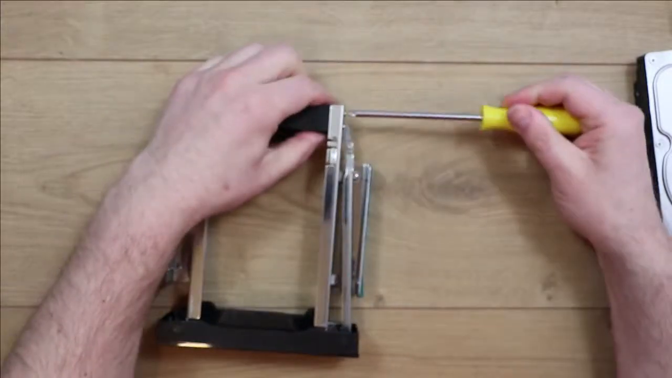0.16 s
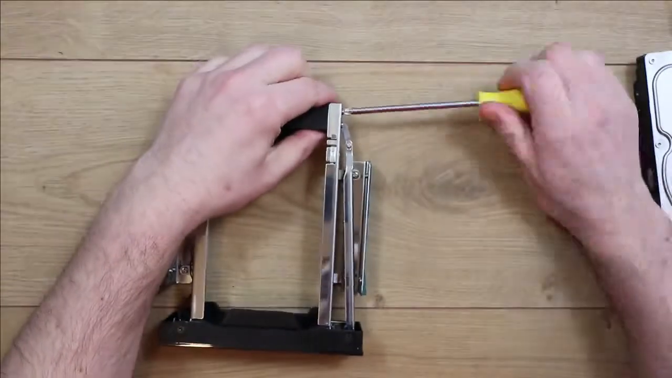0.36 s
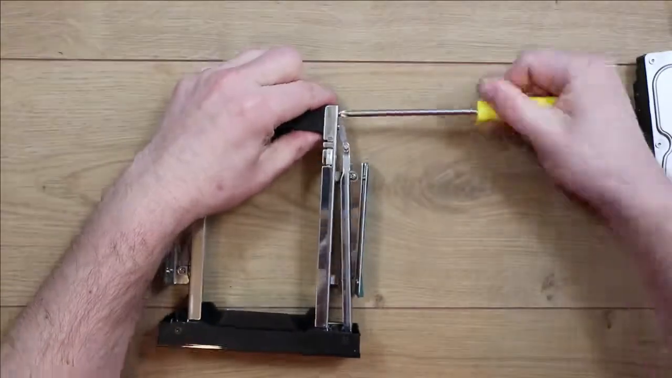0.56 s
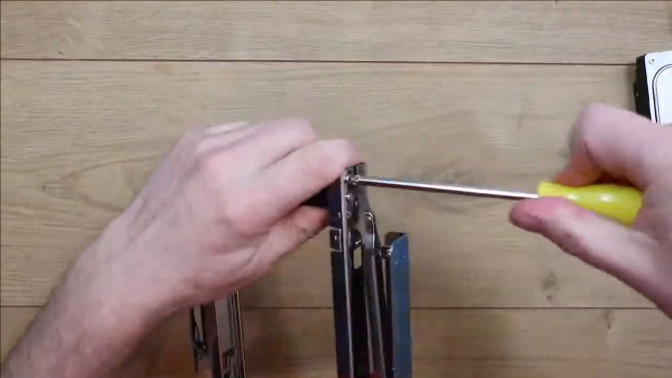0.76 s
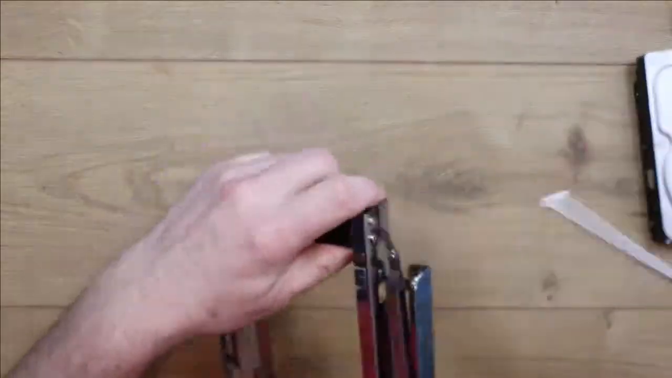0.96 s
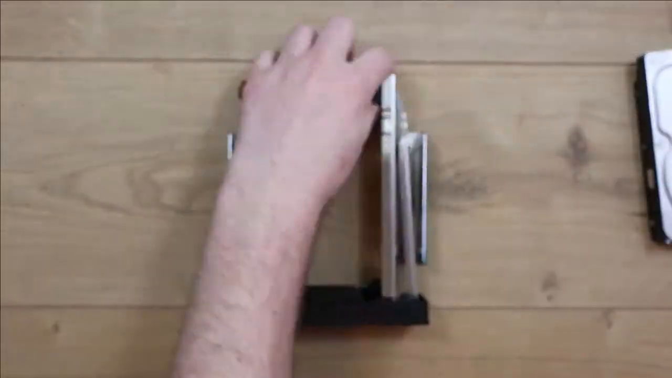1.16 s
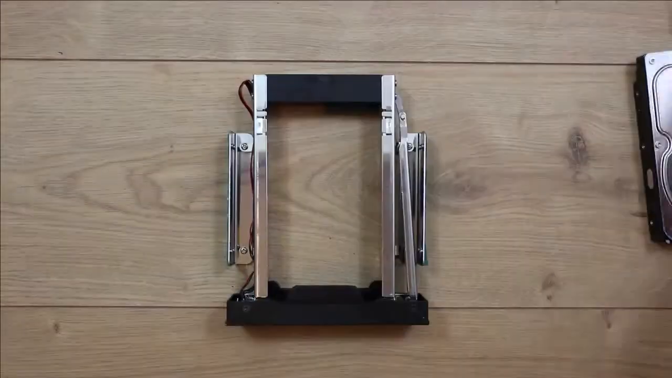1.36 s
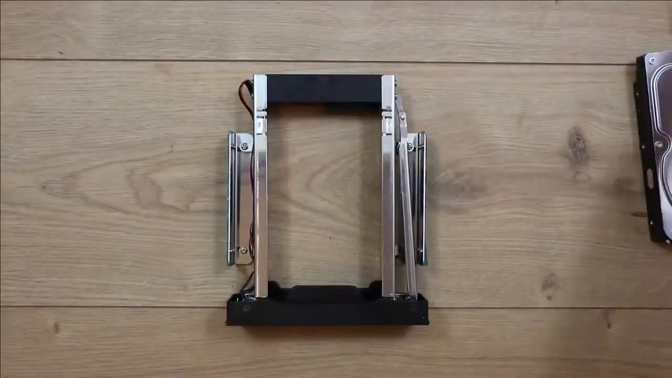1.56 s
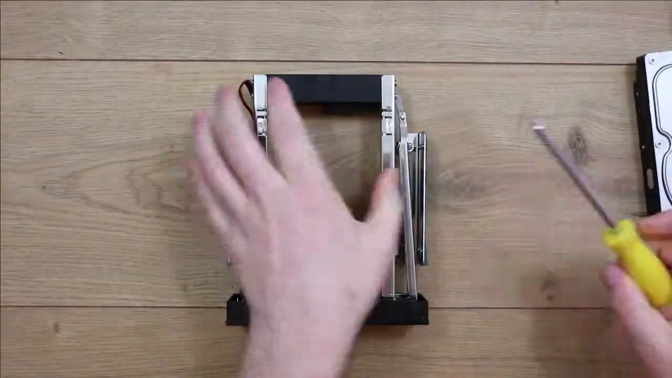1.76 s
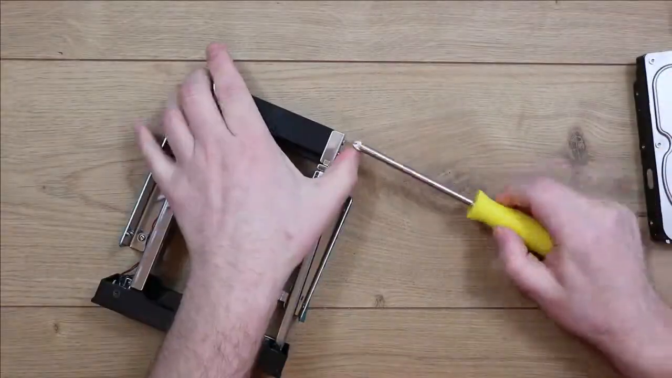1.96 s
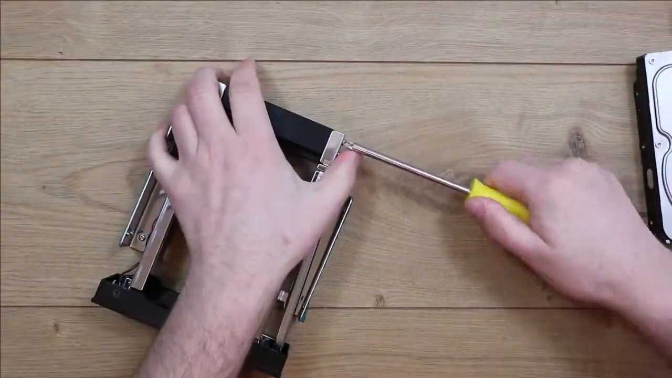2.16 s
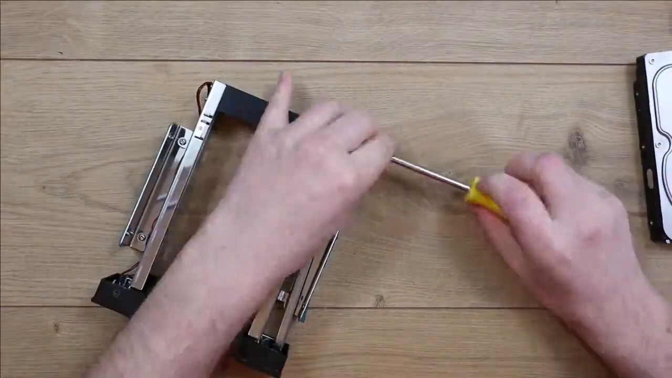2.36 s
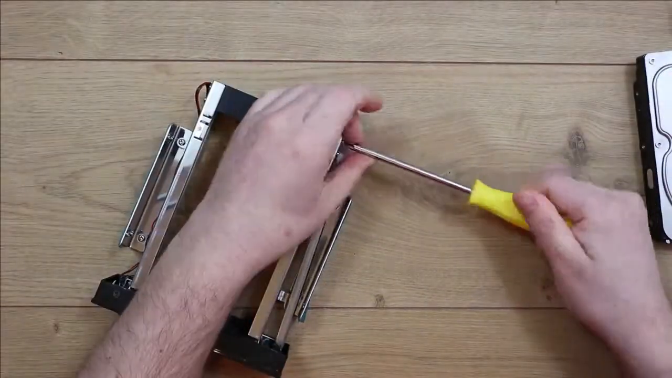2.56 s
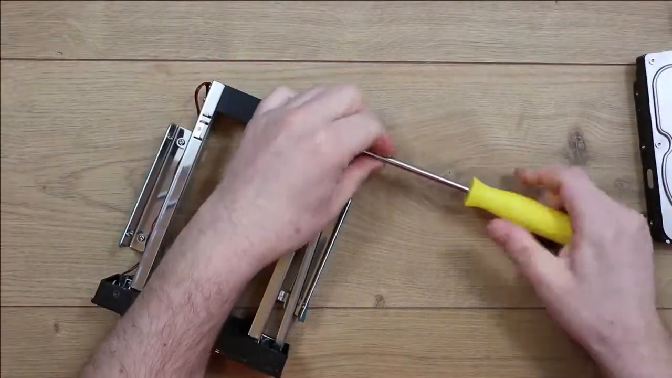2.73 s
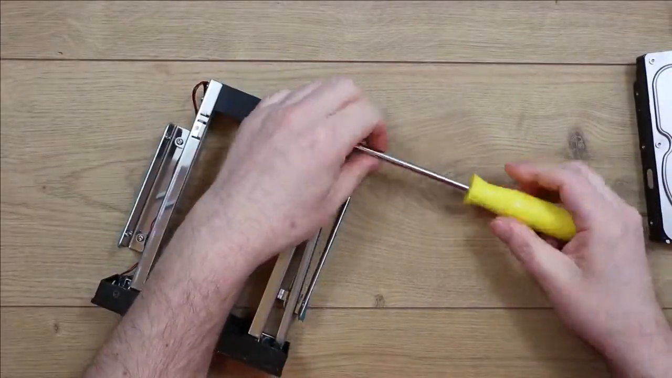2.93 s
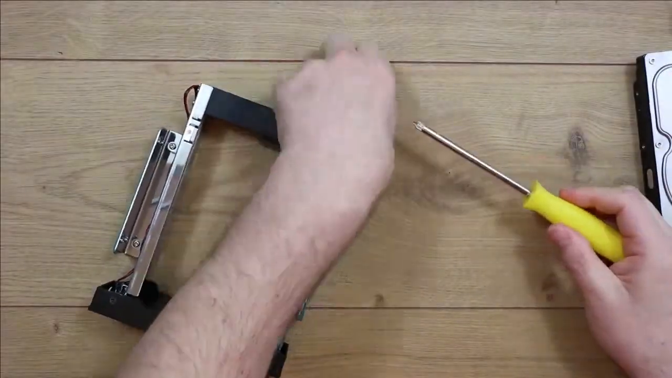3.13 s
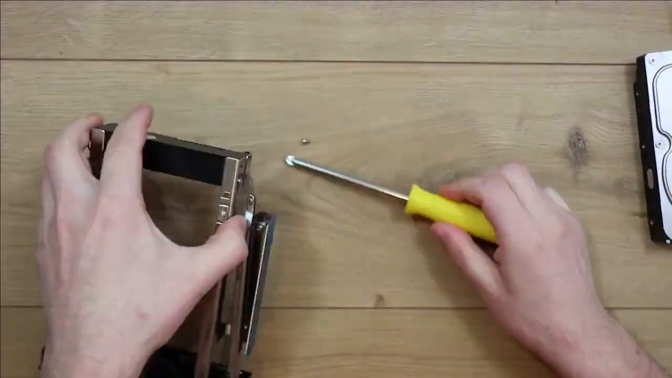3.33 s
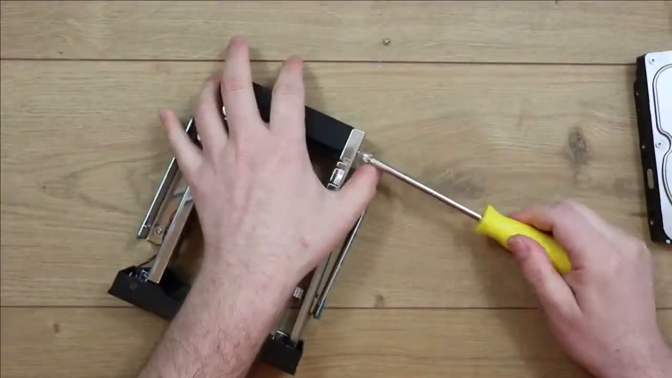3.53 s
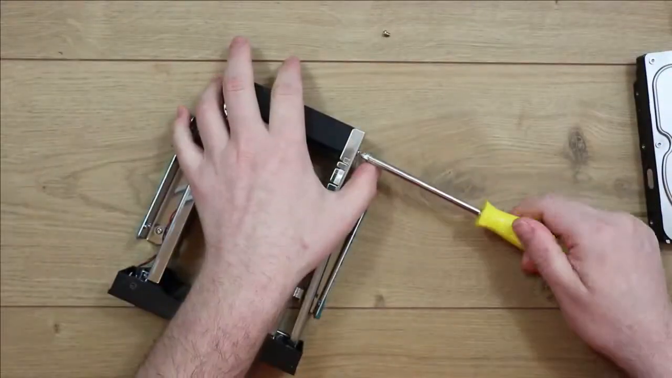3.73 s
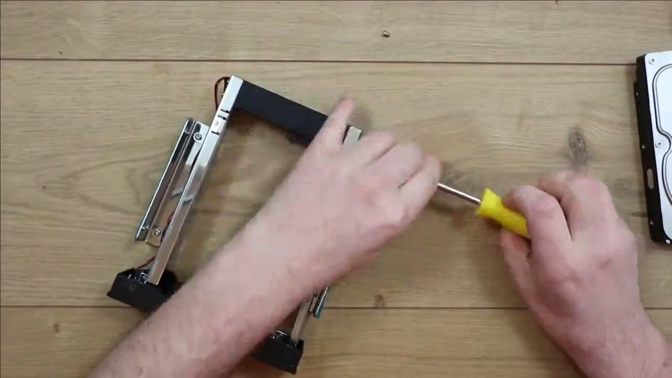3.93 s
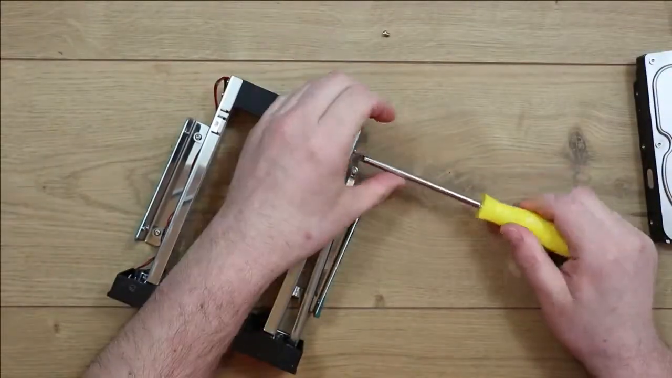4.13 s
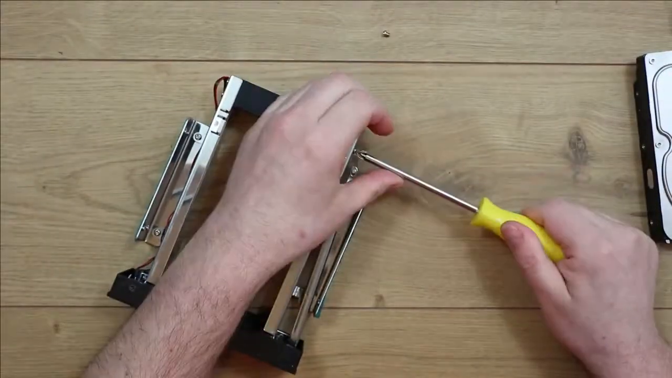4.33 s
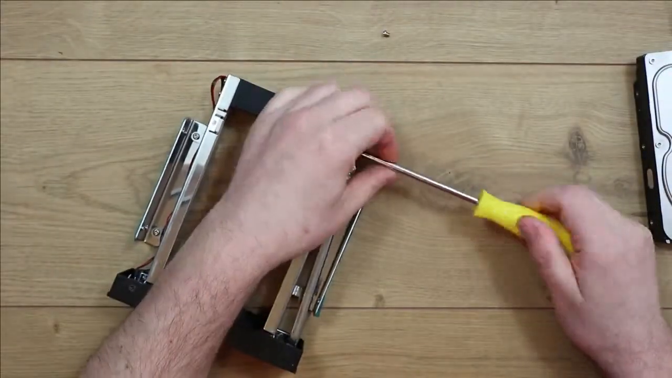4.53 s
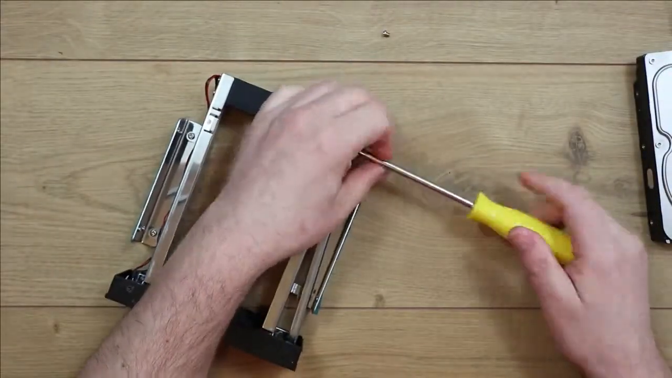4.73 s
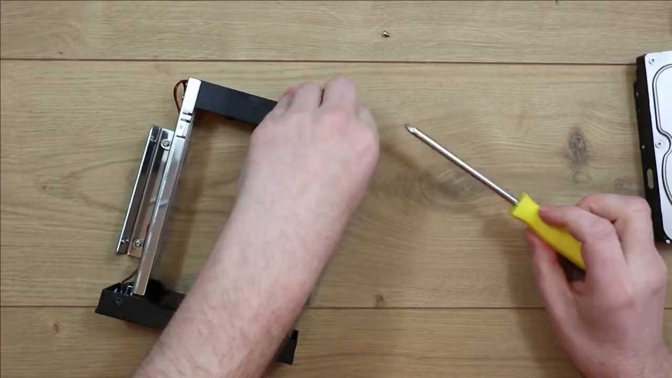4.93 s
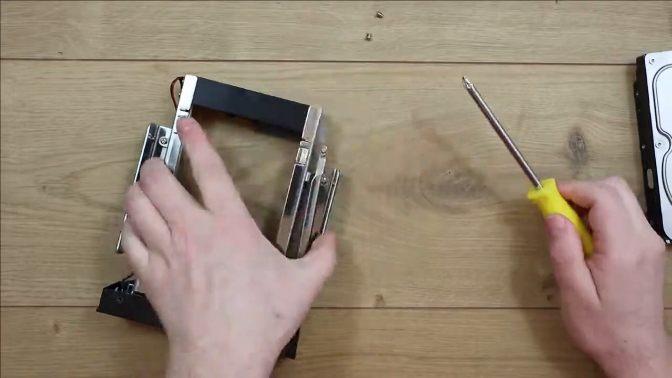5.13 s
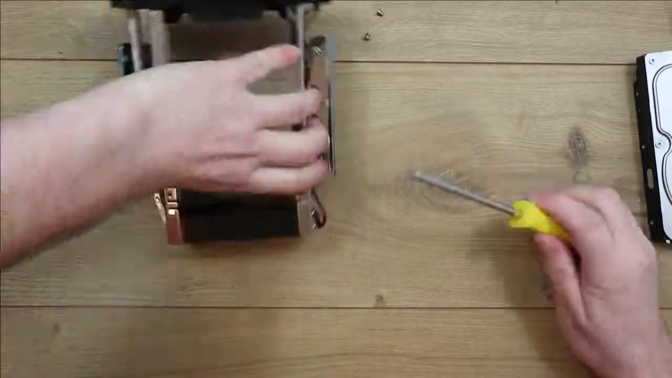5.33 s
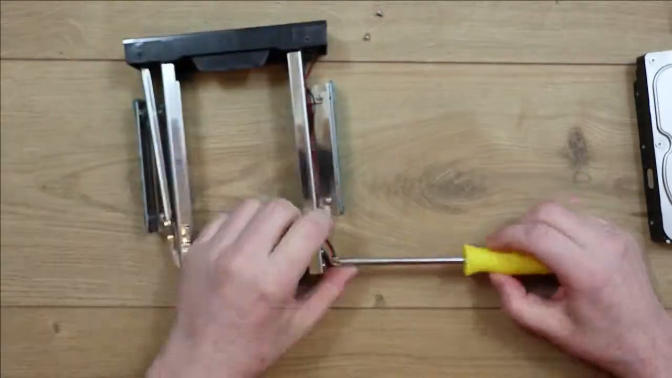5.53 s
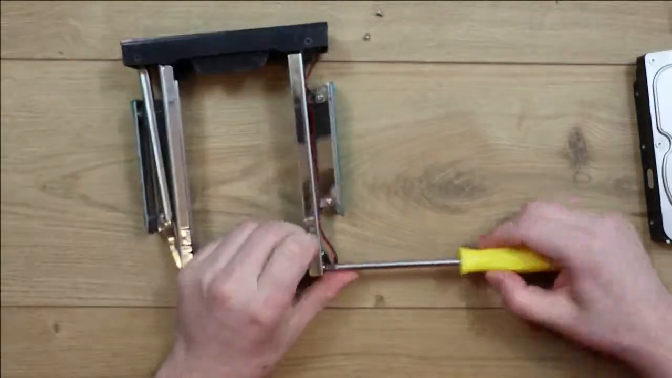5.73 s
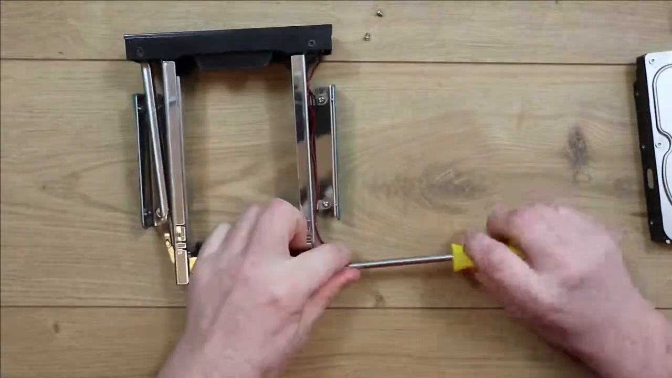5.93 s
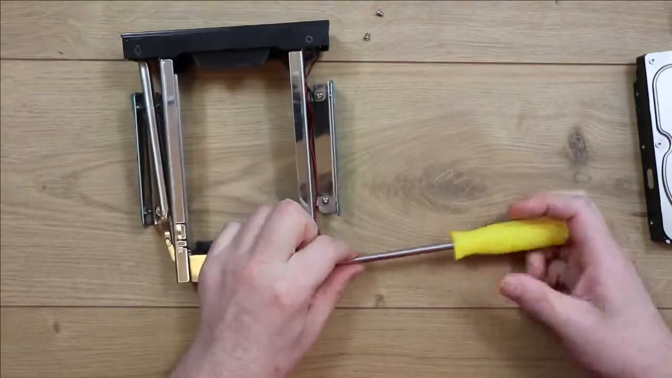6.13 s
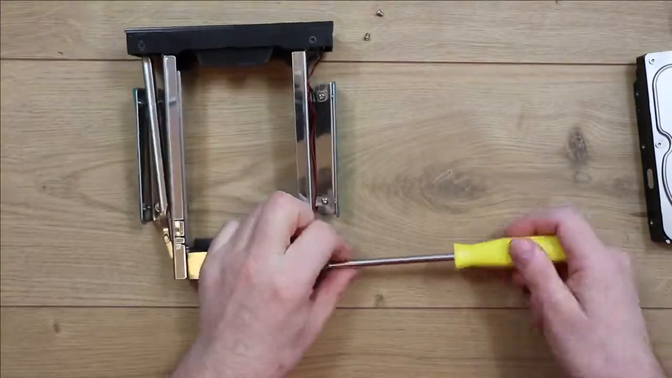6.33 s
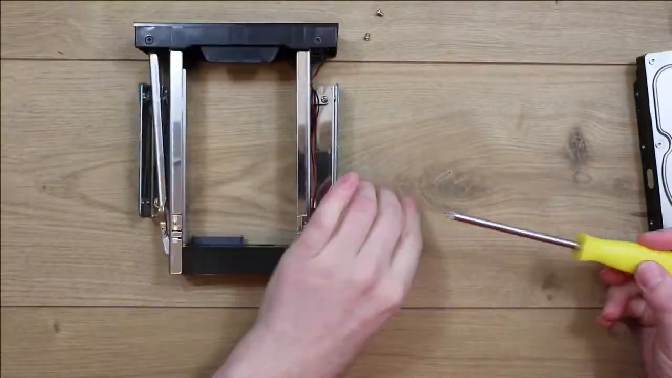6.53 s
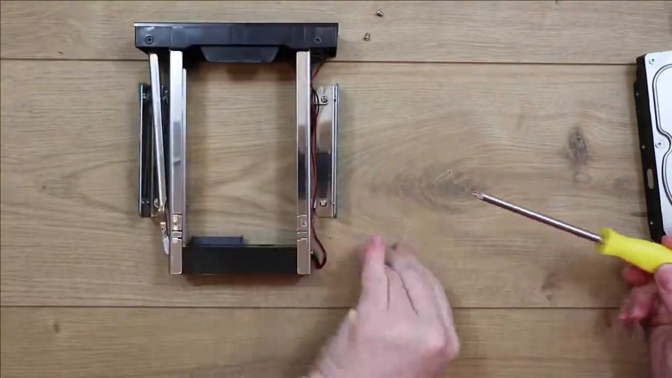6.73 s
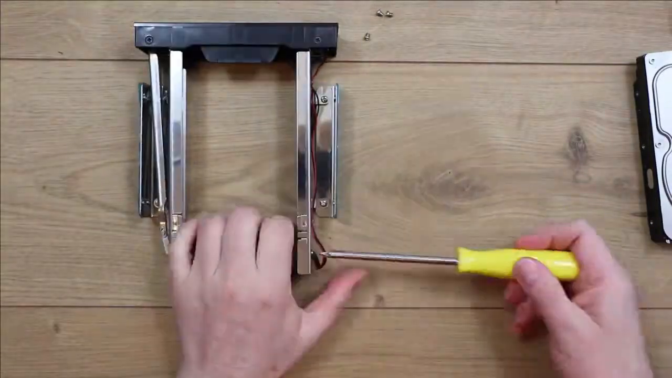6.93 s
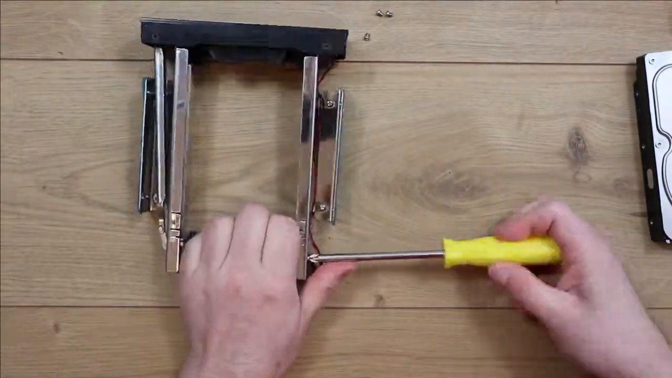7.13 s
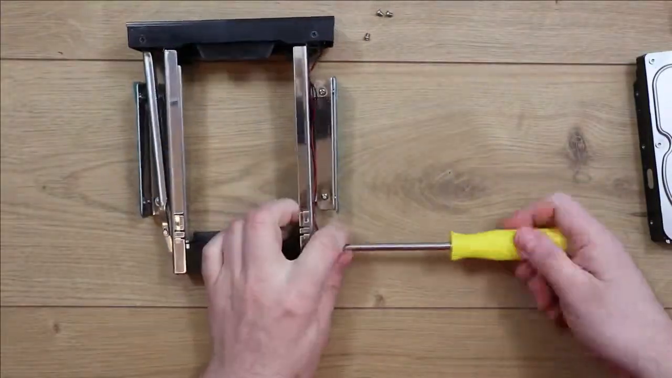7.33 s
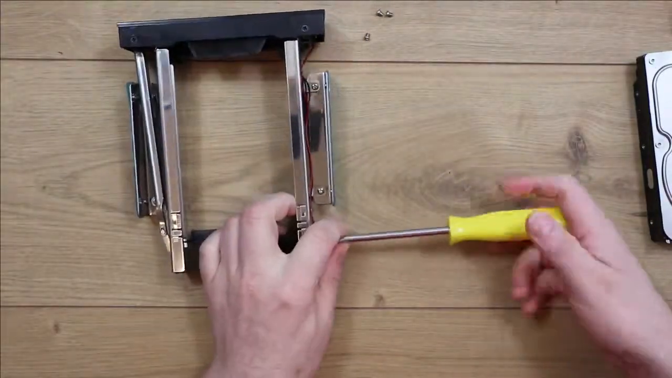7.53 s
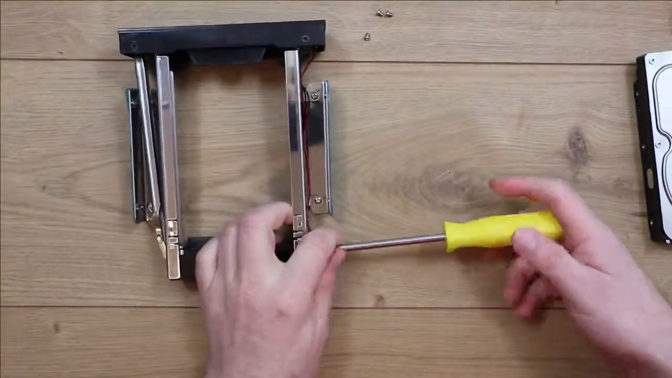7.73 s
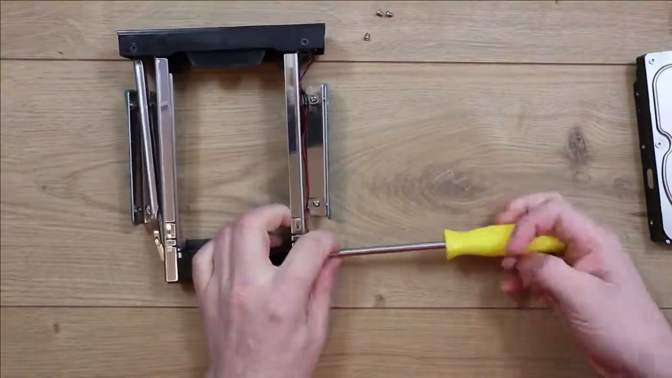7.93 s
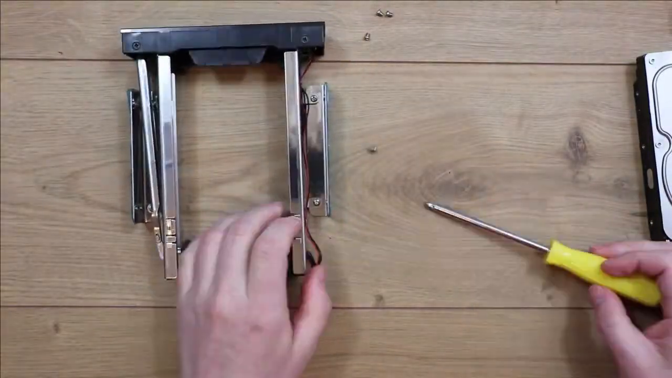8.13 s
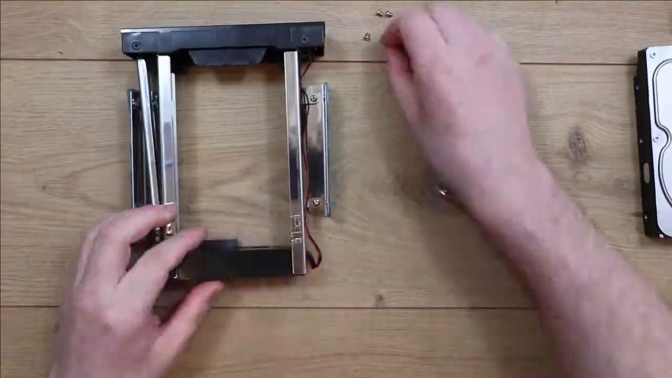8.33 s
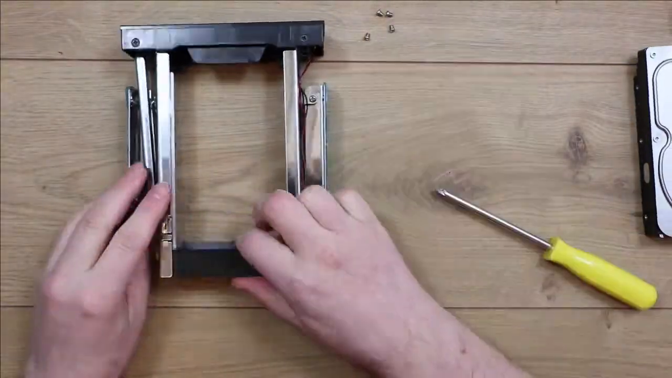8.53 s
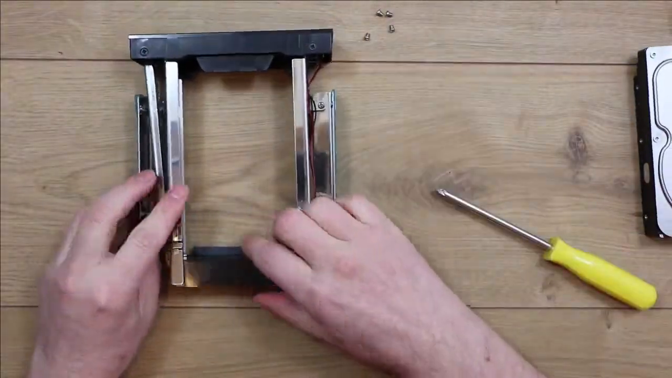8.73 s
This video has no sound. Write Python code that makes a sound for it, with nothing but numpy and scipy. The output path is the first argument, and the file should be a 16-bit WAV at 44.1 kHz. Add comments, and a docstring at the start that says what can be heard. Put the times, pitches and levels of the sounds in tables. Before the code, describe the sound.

Irregular handling of small metal parts on a wooden board, heard very close and dry: crisp steel ticks, short hollow frame clacks, dull low knocks and tiny scrapes. Bursts of contact alternate with faint fingering and screwdriver clicks. A thin electric hum and hiss sit steadily behind, dipping slightly after the loudest hits. The opening instant has a deeper, wider hum that stops abruptly; the ending is almost only hum.

```python
"""A screwdriver turns small screws out of a metal drive frame on a wooden table, close under a camera.
Steel ticks are decaying noise, the frame clacks in damped modes, knocks ring the board, and slides are lumpy noise.
A machine hums thinly in the room: sines with drifting phase, narrow noise bands and hiss.
For the first instant a deeper, wider hum of noise bands is heard instead, then it cuts off.
The camera's gain control dips after loud moments."""
import sys
import numpy as np
from scipy import signal
from scipy.fft import rfft, irfft, next_fast_len
from scipy.io import wavfile
from scipy.ndimage import uniform_filter1d, map_coordinates

SR = 44100
rng = np.random.default_rng(int(sys.argv[2]) if len(sys.argv) > 2 else 0)


def file_out(sig):
    """Save sig as 16-bit WAV at sys.argv[1]."""
    # one column per channel
    cols = np.atleast_2d(sig).T
    # limit, then scale
    lim = np.clip(cols, -1, 1)
    pcm = np.round(lim * 32767).astype(np.int16)
    wavfile.write(sys.argv[1], SR, pcm)


N = 387198
SECONDS = np.arange(N) / SR
CUT_S = 0.128  # the opening hum stops and the room begins

# resonances of the metal frame: (frequency [Hz], bandwidth [Hz], relative level [dB])
FRAME = [(972, 92, 5), (1118, 56, 1.5), (1279, 58, -1), (1457, 49, 1.5), (1726, 55, 3.5), (1966, 64, 1),
         (2570, 33, -7), (3188, 22, -2)]
# faint thudding in the table top, before its random flutter: (time [s], level [dB])
MURMUR = [(0.14, -69.5), (0.33, -61.5), (0.52, -56), (1.29, -68), (1.75, -57.5), (1.92, -63.5), (4.04, -61),
          (4.37, -71), (4.85, -50.5), (5.53, -67), (6.15, -50.5), (6.4, -53.5), (6.64, -66), (7.45, -53),
          (7.89, -54), (8.06, -47.5), (8.39, -64.5), (8.78, -61)]


def amp(db):
    """Decibels to gain."""
    return 10 ** (np.asarray(db) / 20)


def unit(x):
    """Scaled to rms 1."""
    return x / np.sqrt(np.mean(x ** 2) + 1e-20)


def decay(t, t60):
    """Exponential fall of 60 dB in t60 seconds."""
    return amp(-60 * t / t60)


def onset(t, rise_s):
    """Exponential rise towards 1 with time constant rise_s."""
    return 1 - np.exp(-t / rise_s)


def sine(hz, t, phase=0):
    """Pure tone with an optional phase in radians."""
    return np.sin(2 * np.pi * hz * t + phase)


def along(points, hz):
    """Values of (frequency, value) points, interpolated on a log frequency axis."""
    f, v = np.transpose(points)
    return np.interp(np.log(hz + 1), np.log(f + 1), v)


def curves(rows):
    """One curve over the whole scene for each column after the time."""
    s, *cols = np.transpose(rows)
    return [np.interp(SECONDS, s, c) for c in cols]


def wobble(rate):
    """A smooth random curve, rate knots a second."""
    knots = rng.standard_normal(int(N * rate / SR) + 4)
    return map_coordinates(knots, [SECONDS * rate])


def filtered(x, response):
    """x shaped by a complex response of frequency."""
    m = next_fast_len(N + 8192)
    shaped = rfft(x, m) * response(np.fft.rfftfreq(m, 1 / SR))
    return irfft(shaped, m)[..., :N]


def highpass(hz):
    """First-order bass roll-off below hz."""
    return lambda f: 1j * f / (hz + 1j * f)


def modes(table):
    """Causal response of a bank of resonances with alternating signs."""
    def response(f):
        total = 0
        for k, (centre, width, db) in enumerate(table):
            resonance = 1j * f * width / (centre ** 2 - f ** 2 + 1j * f * width)
            total = total + (-1) ** k * amp(db) * resonance
        return total
    return response


def noise(spectrum):
    """Coloured noise of rms 1."""
    return unit(filtered(rng.standard_normal(N), lambda hz: amp(along(spectrum, hz))))


def fuzzy_tone(hz, width_hz):
    """Narrow noise of rms 1 around one pitch, with a bell-shaped band."""
    return unit(filtered(rng.standard_normal(N), lambda f: np.exp(-((f - hz) / width_hz) ** 2)))


def add(track, s, sound):
    """Mixes a sound in at time s."""
    part = track[round(s * SR):][:len(sound)]
    part += sound[:len(part)]


def lagged(x, seconds):
    """x followed sluggishly, by a one-pole smoother."""
    keep = np.exp(-1 / (seconds * SR))
    return signal.lfilter([1 - keep], [1, -keep], x)


def steel_noise(patch_db):
    """Dull and bright steel-coloured noise whose colour flickers at random from moment to moment."""
    # colour of ticks and rasp: (frequency [Hz], relative density [dB per Hz])
    steel_colour = [(700, -16), (1500, 2), (2500, 3.5), (3500, 2.5), (5000, -0.5), (7400, -3.5),
                    (10000, -9), (16000, -13)]
    z = signal.stft(noise(steel_colour), nperseg=256)[2]
    across_pitch = uniform_filter1d(rng.standard_normal(z.shape), 3, 0)
    patches = unit(uniform_filter1d(across_pitch, 5, 1))
    both = signal.istft(z * amp(patch_db * patches), nperseg=256)[1][:N]
    bright = filtered(both, lambda hz: 1 / (1 + (7000 / (hz + 1)) ** 8))
    return unit(both - bright), unit(bright)


def opening():
    """A deep buzzing hum of narrow noise bands in a wide rumble, cut off short."""
    # hum bands: (frequency [Hz], band half-width [Hz], rms level [dB])
    deep_bands = [(49.7, 9, -58), (98, 6.8, -40.5), (191, 29, -53.5), (294, 46, -55.5)]
    # rumble colour: (frequency [Hz], relative density [dB per Hz])
    deep_colour = [(88, -12), (150, -13), (259, -16), (475, -7), (545, -20), (601, -11), (1290, -21.5),
                   (2600, -27.5), (16000, -52)]
    hum = sum(amp(db) * fuzzy_tone(hz, width) for hz, width, db in deep_bands)
    air = amp(-51.5) * noise(deep_colour)
    wide_colour = deep_colour[:1] + [(400, -3), (3000, -10), (16000, -56)]
    wide = amp(-58.0) * noise(wide_colour)
    # opposite signs left and right spread the rumble
    return (hum + air + np.array([wide, -wide])) * (SECONDS <= CUT_S)


def room():
    """A hum with thin tones above it, hiss, and hands thudding faintly in the table top."""
    # fuzzy bands above the hum: (frequency [Hz], band half-width [Hz], level against the hum [dB])
    whine_bands = [(942, 30, -16.5), (1634, 130, -19), (2400, 130, -24), (3160, 54, -25.5)]
    # room hiss: (frequency [Hz], relative density [dB per Hz])
    hiss_colour = [(25, -6), (90, -3.5), (180, 7.5), (400, 4.5), (750, 4), (1200, -0.5), (1800, 1),
                   (2500, 2), (3600, -3.5), (4500, -2), (5600, -8.5), (10000, -15), (16000, -16)]
    murmur_db, = curves(MURMUR)
    hum = 1.3 * sine(500.6, SECONDS, 0.38 * wobble(5)) + 0.54 * fuzzy_tone(502.3, 42)
    thin_tone = amp(-13.5) * sine(1583, SECONDS, 0.42 * wobble(8.7))
    whine = sum(amp(db) * fuzzy_tone(hz, width) for hz, width, db in whine_bands)
    machine = amp(1.33 * wobble(12)) * (hum + thin_tone + whine)
    hiss = amp(-7 + 1.2 * wobble(30)) * noise(hiss_colour)
    murmur = amp(murmur_db + 4.5 * wobble(30)) * fuzzy_tone(287, 41.6)
    return (amp(-52) * (machine + hiss) + murmur + fidgeting()) * (SECONDS > CUT_S)


def fidgeting():
    """Fingers and tool tip make countless faint ticks, thickest while the table murmurs; they also nudge the frame."""
    busy_follows = 0.6  # how far the tick rate follows the murmur [dB per dB]
    when, size, nudge = rng.random((400, 3)).T
    busy = np.cumsum(amp(busy_follows * curves(MURMUR)[0]))
    at = np.searchsorted(busy / busy[-1], when)
    blows, nudges = np.zeros(N), np.zeros(N)
    # the logarithms make strong ticks rare
    blows[at] = amp(-68.5 - 4.4 * np.log(size + 0.02))
    nudges[at] = amp(-24.5 - 1.97 * np.log(nudge + 0.049))
    fall = decay(np.arange(SR // 20) / SR, 0.046)
    grit, rasp = steel_noise(patch_db=8)
    ticks = signal.fftconvolve(blows, fall)[:N] * (0.93 * grit + rasp)
    return ticks + filtered(nudges, modes(FRAME))


def taps():
    """Each steel contact is a sharp spike and a dying crack of noise, dull or bright."""
    # steel ticks: (time [s], level [dB], share above 7 kHz [dB])
    contacts = [(0.2156, -37, 0), (0.265, -41, -4), (0.393, -38, -0.5), (0.4494, -27, -1.5),
                (0.635, -32.5, -7), (1.1031, -22, -0.5), (1.1383, -20, 2), (1.1719, -22.5, -4.5),
                (1.2482, -25.5, -17), (1.2717, -11.5, -5.5), (1.3355, -41, -2.5), (1.363, -20.5, -14.5),
                (1.427, -25, -9.5), (1.4959, -18.5, -1), (1.598, -27.5, -8), (1.6863, -29.5, -11),
                (1.724, -34.5, -9), (2.0928, -41.5, -3.5), (2.3992, -34, -3), (2.422, -36.5, -8.5),
                (2.474, -34.5, -5.5), (2.5855, -42, -4.5), (2.6215, -30.5, -5.5), (2.899, -31.5, -3),
                (2.931, -36.5, -12.5), (2.9494, -39.5, -9), (2.98, -34, -4), (3.0063, -35, 0),
                (3.3113, -27, -15), (3.3301, -26, -0.5), (3.3665, -27, -0.5), (3.4902, -16, -0.5),
                (3.7251, -31, -1), (3.787, -36.5, -7), (3.9038, -32.5, -1), (3.9956, -25.5, -1),
                (4.036, -35, -3), (4.07, -25, -1.5), (4.1825, -38.5, -2), (4.3006, -38.5, -3),
                (4.4257, -41, -2), (4.6613, -44, -12), (4.7016, -36, -4), (4.7354, -32.5, -2.5),
                (4.7713, -30.5, -7), (4.8489, -38.5, -1), (4.8695, -33.5, -12), (4.9104, -25, 0.5),
                (4.9905, -31, -0.5), (5.0646, -38.5, 0), (5.1323, -32.5, -3), (5.1818, -29.5, -1.5),
                (5.2296, -29, -0.5), (5.4233, -16, -3.5), (5.567, -38.5, -0.5), (5.642, -33, 0),
                (5.806, -25.5, -0.5), (5.8658, -39.5, -6.5), (6.0439, -34.5, -4.5), (6.243, -34, -4),
                (6.2635, -22, -3), (6.3113, -38, -14), (6.391, -38, -6), (6.4194, -31.5, -6),
                (6.4396, -20, -2), (6.4651, -15, -3), (6.987, -35, -3), (7.0062, -31, -0.5),
                (7.089, -31.5, -2), (7.131, -23.5, -4.5), (7.1535, -28.5, -0.5), (7.236, -17, -9),
                (7.26, -31.5, -14), (7.305, -34, -3), (7.329, -34.5, -2.5), (7.3574, -38.5, -2.5),
                (7.664, -40.5, -4), (7.9006, -40.5, -1), (7.979, -40, -7), (8.0477, -30.5, -2.5),
                (8.115, -21, -5), (8.1616, -10, 0), (8.214, -18.5, -9.5), (8.2568, -27, -16),
                (8.5588, -26, -0.5), (8.6486, -41.5, -23), (8.713, -35.5, -2.5), (8.763, -42.5, 2)]
    t60_s, t60_spread = 0.044, 0.14  # typical decay, and its log scatter
    t = np.arange(SR // 10) / SR
    dull, bright = np.zeros(N), np.zeros(N)
    for (s, db, bright_db), chance in zip(contacts, rng.standard_normal(len(contacts))):
        share = np.clip(amp(bright_db), 0, 0.97)
        spike = 0.7 * decay(t, 0.0068)
        crack = decay(t, t60_s * np.exp(t60_spread * chance)) * onset(t, 0.00087)
        fall = amp(db - 7) * (crack + spike)
        add(dull, s, np.sqrt(1 - share ** 2) * fall)
        add(bright, s, share * fall)
    low, high = steel_noise(patch_db=4.5)
    return dull * low + bright * high


def knocks():
    """Soft blows ring a close pair of low board modes, whose beat swells, dips and rebounds, and one mode above."""
    # knocks into the table top: (time [s], low pair level [dB], upper mode level [dB])
    board_hits = [(0.217, -60, -51), (0.352, -40, -46.5), (0.385, -32.5, -41.5), (0.53, -26.5, -37.5),
                  (0.745, -27, -55.5), (1.112, -44.5, -40), (1.143, -29.5, -35.5), (1.218, -40, -46),
                  (1.433, -45.5, -41), (1.612, -38.5, -41), (1.831, -33.5, -32), (1.936, -43.5, -45),
                  (2.344, -45, -37), (2.403, -35, -40.5), (2.428, -37.5, -41), (2.624, -47.5, -35),
                  (2.899, -41, -41), (2.932, -47, -35), (2.981, -43, -36.5), (3.304, -36, -41),
                  (3.375, -49, -37), (3.459, -26, -32), (3.492, -23.5, -24.5), (3.851, -35.5, -47),
                  (3.907, -38.5, -31), (3.996, -37, -38), (4.072, -38, -41), (4.427, -63, -42),
                  (4.82, -55.5, -38.5), (4.911, -44, -36), (4.99, -48, -40), (5.133, -30.5, -37),
                  (5.226, -42, -40.5), (5.251, -40.5, -41), (5.425, -37, -28), (5.457, -31, -41),
                  (5.808, -51, -38.5), (5.946, -34, -42), (5.979, -38.5, -42), (6.026, -37.5, -39),
                  (6.2, -39, -41), (6.265, -38, -31.5), (6.359, -36.5, -40), (6.405, -40, -53),
                  (6.466, -32.5, -25.5), (6.595, -36, -41), (6.875, -40, -51), (6.986, -27.5, -41.5),
                  (7.135, -34, -33.5), (7.238, -37, -34.5), (7.387, -47, -46.5), (7.548, -41, -40.5),
                  (7.822, -40, -41.5), (7.976, -45, -43), (8.049, -55, -38), (8.116, -30, -24.5),
                  (8.164, -36, -36), (8.204, -40, -39), (8.308, -43, -41.5)]
    pair_hz, pair_scatter_hz, split_hz, upper_hz = 284.2, 13.5, 42.5, 513.2
    t, out = np.arange(SR // 6) / SR, np.zeros(N)
    for (s, low_db, upper_db), chance in zip(board_hits, rng.standard_normal(len(board_hits))):
        hz = pair_hz + pair_scatter_hz * chance
        pair = sine(hz + split_hz / 2, t) - 0.98 * sine(hz - split_hz / 2, t)
        low = amp(low_db) * decay(t, 0.12) * pair * onset(t, 0.00014)
        upper = amp(upper_db + 6.5) * decay(t, 0.072) * sine(upper_hz, t) * onset(t, 0.0023)
        add(out, s, low + upper)
    return out


def clacks():
    """Each clack rings the frame's modes at new strengths, most of all near the spot's own pitch."""
    # clacks of the frame: (time [s], level [dB], frequency of the mode struck hardest [Hz])
    frame_hits = [(0.218, -46, 945), (0.264, -40, 1000), (0.395, -34.5, 977), (0.452, -39, 939),
                  (0.636, -32, 900), (0.668, -30, 1710), (0.689, -36, 1610), (1.104, -28.5, 1010),
                  (1.116, -28, 1460), (1.174, -25, 956), (1.247, -39, 1880), (1.271, -40, 1710),
                  (1.354, -42.5, 2110), (1.364, -31.5, 1760), (1.384, -33, 1750), (1.427, -27, 1980),
                  (1.499, -32, 1450), (1.522, -26, 985), (1.569, -43, 923), (1.599, -29, 1710),
                  (1.637, -26.5, 886), (1.66, -36, 1720), (1.687, -32.5, 1990), (1.734, -41.5, 1530),
                  (1.898, -36.5, 993), (2.16, -40.5, 946), (2.407, -31.5, 950), (2.589, -41, 977),
                  (2.621, -27.5, 1060), (2.897, -39.5, 942), (2.952, -34.5, 1180), (2.982, -33, 1070),
                  (3.143, -38, 1440), (3.299, -41.5, 1040), (3.313, -31.5, 1120), (3.374, -40, 964),
                  (3.428, -31, 958), (3.457, -23, 961), (3.49, -19, 1460), (3.726, -36, 966),
                  (3.906, -34, 1110), (3.996, -40, 991), (4.072, -30, 940), (4.302, -42, 1590),
                  (4.426, -41, 1300), (4.603, -42, 961), (4.672, -40, 931), (4.741, -34.5, 965),
                  (4.771, -34, 1080), (4.819, -41, 937), (4.868, -39, 977), (4.891, -36, 945),
                  (4.916, -32.5, 945), (4.991, -42.5, 982), (5.07, -40.5, 1540), (5.13, -35, 1430),
                  (5.182, -29, 960), (5.249, -38, 980), (5.286, -40, 980), (5.424, -21.5, 1300),
                  (5.451, -28.5, 1640), (5.492, -33, 961), (5.606, -35, 993), (5.807, -33, 970),
                  (5.868, -38, 1750), (6.024, -35, 934), (6.039, -39, 964), (6.122, -45, 1740),
                  (6.244, -29.5, 1700), (6.264, -26.5, 930), (6.315, -38.5, 1760), (6.393, -40, 1730),
                  (6.401, -41, 1750), (6.418, -37, 2020), (6.433, -35.5, 999), (6.465, -20.5, 1390),
                  (6.593, -47, 1740), (6.659, -46.5, 912), (6.985, -36.5, 964), (7.01, -37, 942),
                  (7.133, -25, 1740), (7.217, -36, 961), (7.237, -26.5, 970), (7.26, -34.5, 1390),
                  (7.304, -35, 1900), (7.385, -46.5, 969), (7.472, -45, 921), (7.565, -37, 945),
                  (7.691, -43, 1960), (7.786, -40, 1970), (7.824, -42.5, 937), (7.897, -44.5, 904),
                  (7.94, -42, 2020), (7.983, -40, 961), (8.051, -36, 1580), (8.115, -21, 1380),
                  (8.163, -27.5, 1740), (8.204, -27.5, 934), (8.224, -23, 934), (8.56, -43, 1220),
                  (8.649, -43, 961), (8.731, -41, 960)]
    t, out = np.arange(SR // 8) / SR, np.zeros(N)
    chances = np.clip(rng.standard_normal((len(frame_hits), len(FRAME), 2)), -1.5, 1.5)
    for (s, db, spot_hz), chance in zip(frame_hits, chances):
        ring = np.zeros(len(t))
        for (hz, width, level), (louder, sharper) in zip(FRAME, chance):
            octaves = abs(np.log2(hz / spot_hz))
            near_spot = 4.7 * np.exp(-(octaves / 0.13) ** 2) - 9.1 * octaves
            strength = amp(level + 2.25 * louder + near_spot)
            fall = np.exp(-np.pi * width * t) + 0.11 * decay(t, 0.15)  # main ring and faint tail
            ring += strength * fall * sine(hz * (1 + 0.015 * sharper), t)
        add(out, s, amp(db - 9.5) * ring * onset(t, 0.00029))
    return out


def slides():
    """Dragging and rattling parts make a lumpy rasp that also stirs the frame's resonances."""
    # strokes: (time [s], length [s], frame level [dB], grit 2-7 kHz level [dB], rasp above 7 kHz level [dB])
    strokes = [(0.63, 0.022, -37.5, -50.5, -53), (1.106, 0.054, -38, -40, -49.5),
               (1.256, 0.04, -60, -40, -49), (1.332, 0.05, -65.5, -42, -51.5),
               (1.367, 0.026, -62.5, -39.5, -49), (1.397, 0.04, -50, -53.5, -53),
               (1.428, 0.048, -50.5, -43.5, -47.5), (1.484, 0.071, -54, -46.5, -50.5),
               (1.567, 0.039, -55, -52.5, -52), (1.605, 0.022, -61, -35, -36),
               (1.631, 0.01, -58, -40.5, -52), (1.656, 0.016, -59.5, -46, -55),
               (1.68, 0.027, -53, -41, -48.5), (1.895, 0.054, -42.5, -53.5, -52),
               (2.995, 0.062, -66, -63, -56), (3.301, 0.058, -43.5, -47, -52),
               (3.366, 0.097, -38.5, -37, -32.5), (3.459, 0.017, -33, -43, -49),
               (3.985, 0.037, -44.5, -49, -45.5), (4.539, 0.16, -56.5, -66, -65),
               (4.697, 0.15, -55, -58, -64), (5.038, 0.082, -71, -75, -58), (5.422, 0.05, -41, -52, -51.5),
               (5.864, 0.024, -50, -54, -50), (6.429, 0.022, -36, -48, -39), (7.132, 0.034, -46, -53, -55),
               (7.253, 0.023, -35.5, -56, -51.5), (8.123, 0.021, -46, -48, -47),
               (8.159, 0.028, -38, -41.5, -32.5), (8.198, 0.045, -39, -44, -62.5),
               (8.216, 0.082, -47, -53.5, -84), (8.637, 0.059, -52, -64, -60.5)]
    pressure = np.zeros((3, N))
    for s, length, *dbs in strokes:
        t = np.arange(round((abs(length) + 0.07) * SR)) / SR
        stroke = onset(t, 0.0049) * decay(np.maximum(t - length, 0), 0.04)
        for track, db in zip(pressure, dbs):
            add(track, s, amp(db) * stroke)
    lumps = unit(amp(1.3 * wobble(150) + 3 * wobble(900)))
    stirred = unit(filtered(lumps * rng.standard_normal(N), modes(FRAME)))
    grit, rasp = steel_noise(patch_db=2.8)
    return pressure[0] * stirred + lumps * (pressure[1] * grit + pressure[2] * rasp)


def ports(x, lean, scatter):
    """Two close ports: alike in the bass; in the treble the left is louder and ever-changing scatter sets them apart."""
    # stereo width: (frequency [Hz], side weighting [dB])
    side_weights = [(60, -42), (300, -51), (700, -33), (1500, -24.5), (3000, -17), (5000, -11.5),
                    (15000, -16.5)]
    z = signal.stft(x, nperseg=128)[2]
    random_phase = np.exp(2j * np.pi * rng.random(z.shape))
    apart = unit(signal.istft(z * random_phase, nperseg=128)[1][:N]) * np.std(x)
    side = filtered(lean * x + scatter * apart, lambda hz: amp(along(side_weights, hz)))
    return np.array([x + side, x - side])


def scene():
    """All sources at the two ports; the work lies a little to the left, and the light frame radiates little bass."""
    frame = filtered(taps() + clacks() + slides(), highpass(250))
    work = ports(frame + knocks(), lean=0.7, scatter=1.45)
    return work + ports(room(), lean=0.15, scatter=1.0) + opening()


def record(dry):
    """Gain control, deaf to the bass, turns the camera down after loud moments; nothing is kept above the band limit."""
    knee_db, slope = -41.5, 0.35  # slope: dB of cut per dB well above the knee
    react_s, recover_s = 0.024, 0.068  # time constants of two smoothers in series
    senses_hz, top_hz = 890, 15900
    sensed = filtered(dry, highpass(senses_hz))
    power = lagged(lagged(np.mean(sensed ** 2, axis=0), react_s), recover_s)
    gain = (1 + power / amp(2 * knee_db)) ** (-slope / 2)
    return filtered(dry * gain, lambda hz: hz < top_hz)


dry = scene()
out = record(dry)
file_out(out)
```